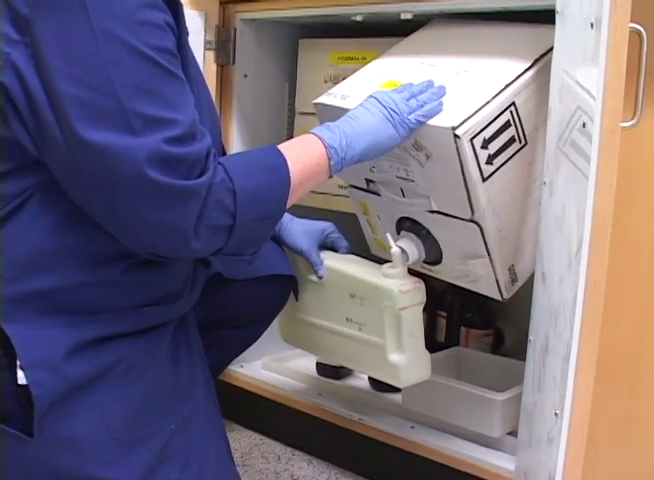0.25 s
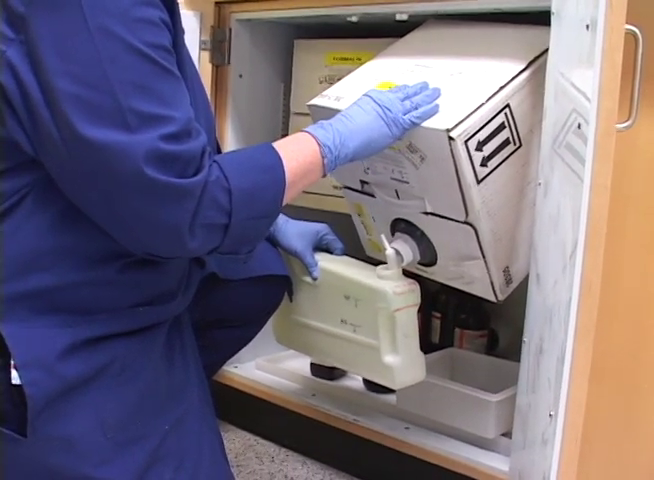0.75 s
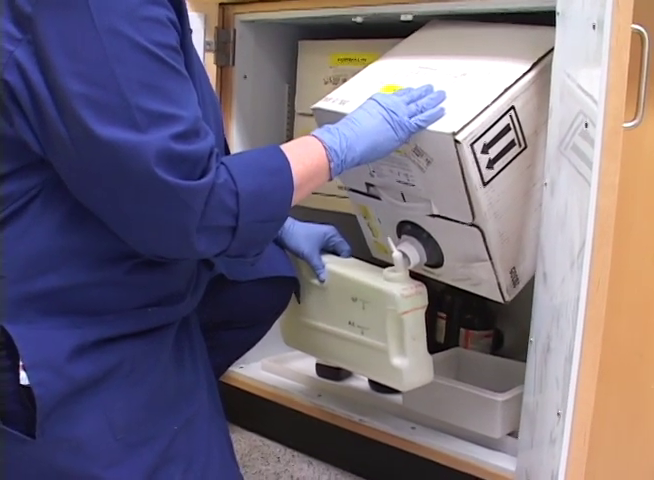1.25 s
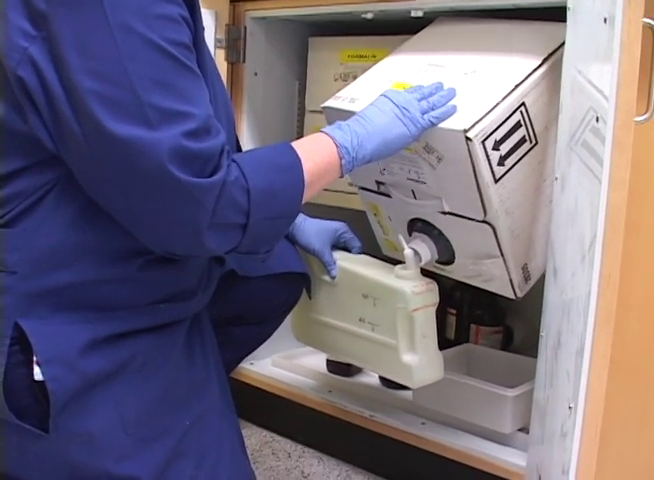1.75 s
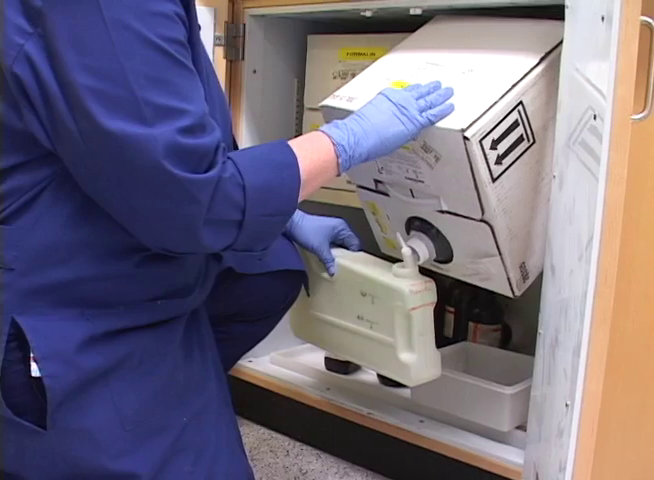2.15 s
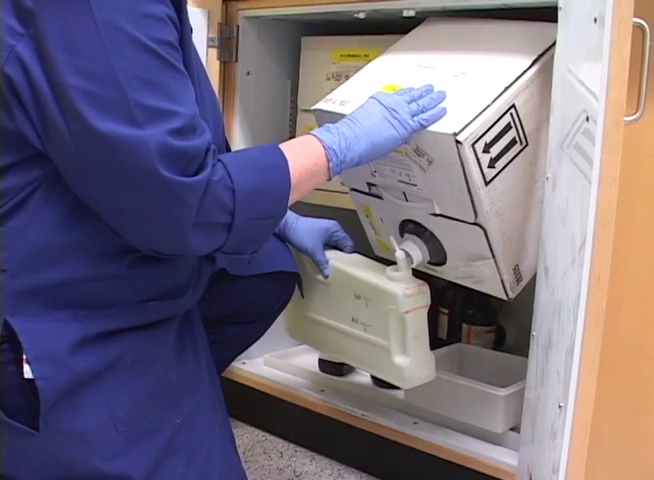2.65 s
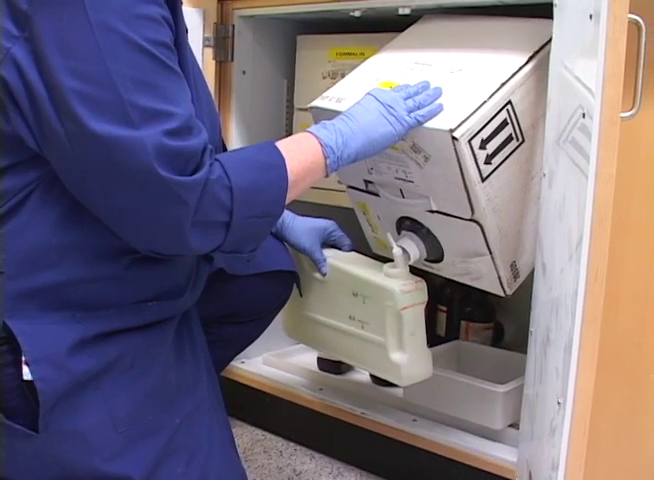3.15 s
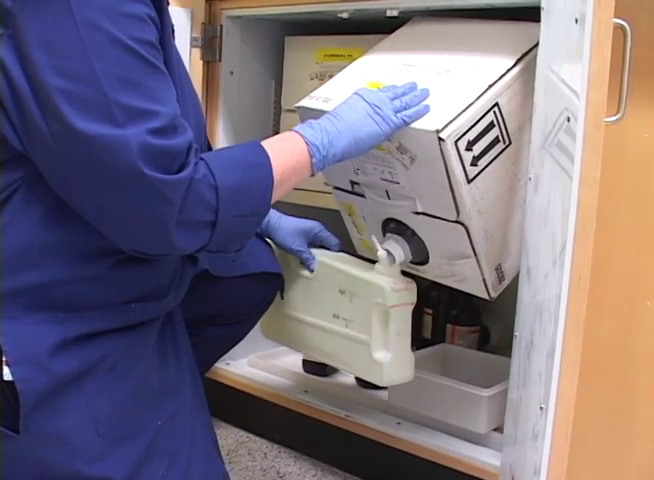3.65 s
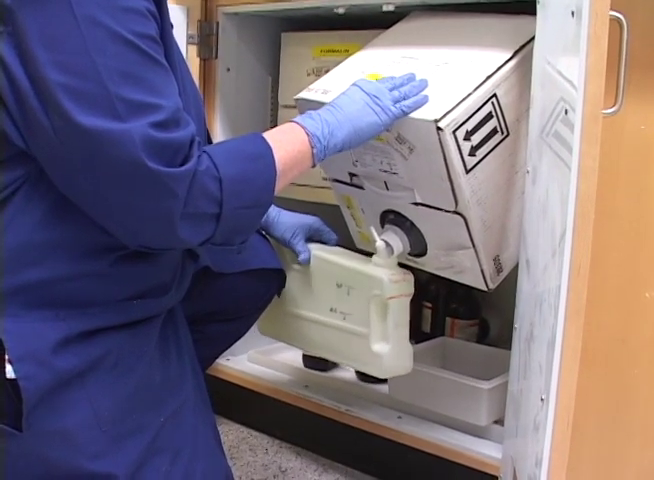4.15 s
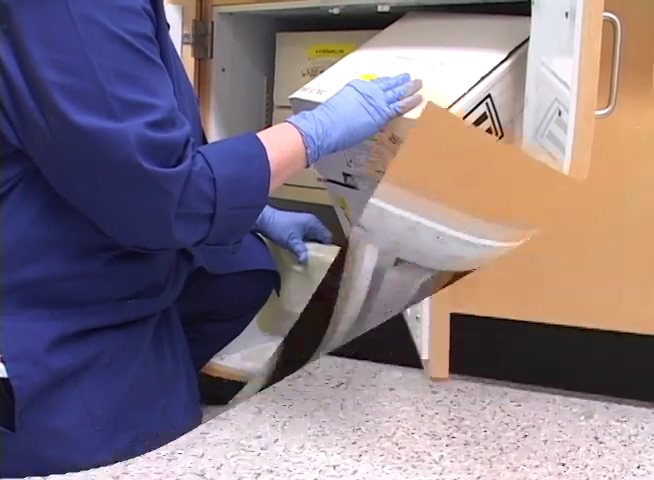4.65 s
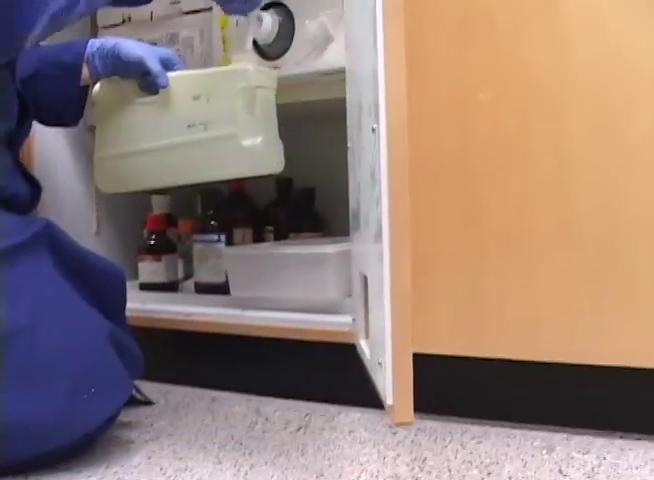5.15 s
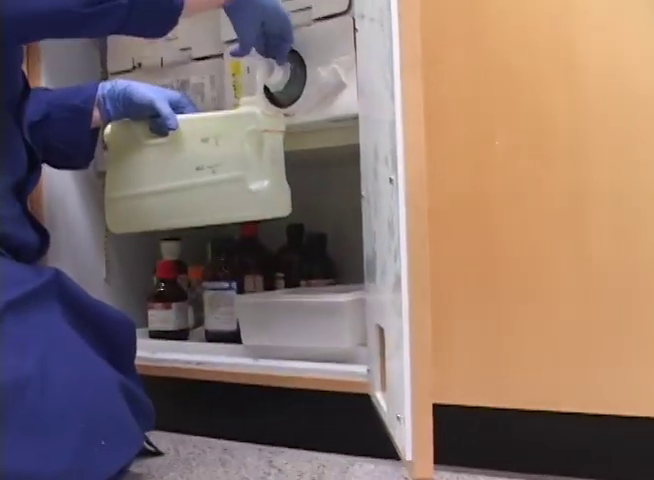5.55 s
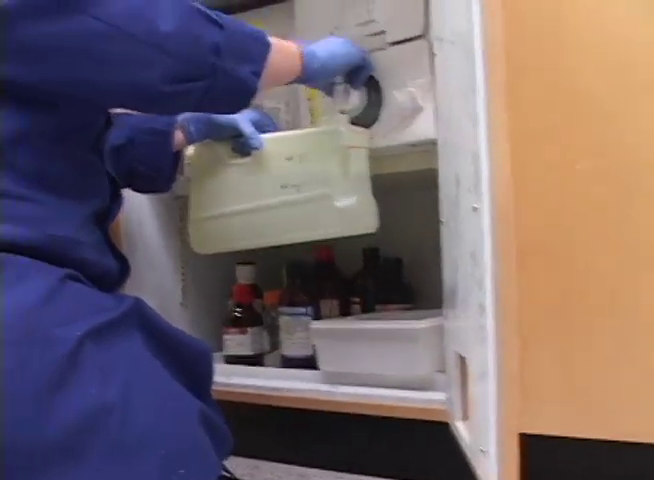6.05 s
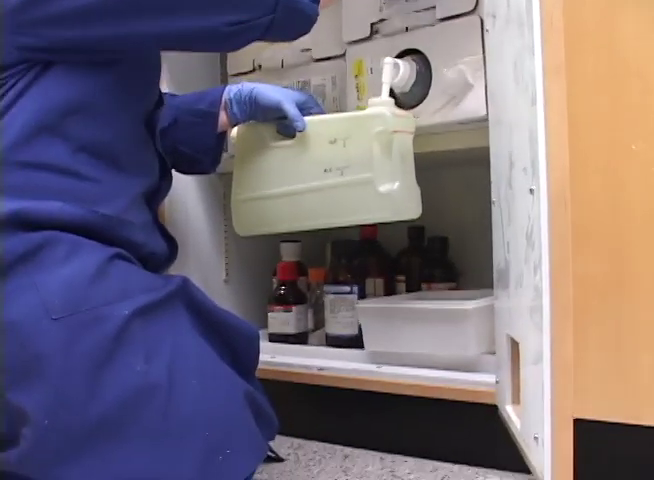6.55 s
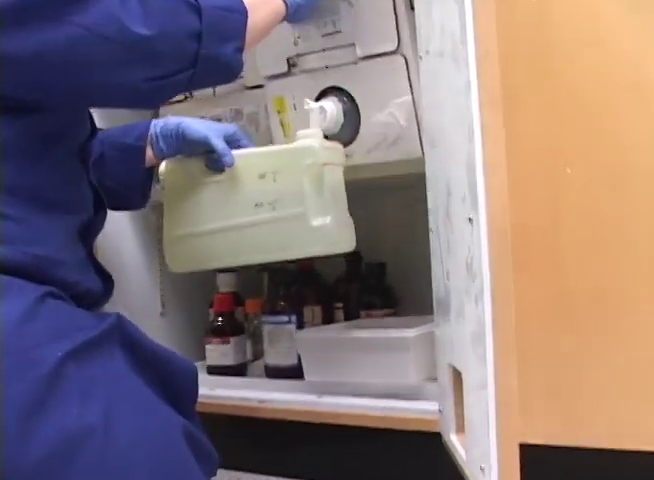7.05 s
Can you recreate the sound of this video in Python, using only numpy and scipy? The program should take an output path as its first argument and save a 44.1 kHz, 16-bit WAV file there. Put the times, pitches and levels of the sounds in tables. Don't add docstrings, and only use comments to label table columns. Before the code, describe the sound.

A thin stream trickles and plinks into a plastic bottle, a hollow knock follows, then gloved hands rub and creak and a tap lever snaps shut.

```python
import sys
import numpy as np
from scipy import signal
from scipy.io import wavfile
from scipy.ndimage import uniform_filter1d

SR = 44100
rng = np.random.default_rng(int(sys.argv[2]) if len(sys.argv) > 2 else 0)


def magnitude_from_level(level_db):
    exponent = np.asarray(level_db, float) / 20
    return 10 ** exponent


def digitize_waveform(pressure):
    field = np.atleast_2d(pressure).T
    bounded = np.clip(field, -1, 1)
    quanta = np.round(bounded * 32767).astype(np.int16)
    wavfile.write(sys.argv[1], SR, quanta)


N = 321489
STOP_S = 4.805

# f/Hz, width/Hz, level/dB
HUM_BANDS = [(479, 77, -70), (872, 27, -75), (1308, 22, -74.5), (2410, 113.8, -82), (5350, 192, -86)]
# f/Hz, level/dB per Hz
HISS_COLOUR = [(880, -32), (1500, -7), (2570, -3), (3650, -9), (5450, -16.5), (5950, -14.5), (9510, -16),
               (13700, -29), (15500, -57)]
# t/s, level/dB
STREAM_FLOW = [(0.0, -10.5), (0.15, -6), (0.5, 2.5), (0.71, 1), (1.18, 1), (1.32, 6.5), (1.55, 1.5),
               (1.99, -1.5), (2.46, -3.5), (2.62, 1), (2.9, 4), (3.53, -0.5), (3.74, 6.5), (4.0, 0),
               (4.67, 1.5), (4.8, 1.5)]
# t/s, level/dB
BOTTLE_SWAY = [
    (4.81, 0.5),
    (5.4, -3.5),
    (6.2, 1.5),
    (6.66, -2.5),
    (6.92, 1.5),
    (7.14, 7.5),
    (7.29, 10.5),
]
# f/Hz, width/Hz, level/dB
BOTTLE_AIR = [(119, 130, -10), (175, 22, 7), (238, 37.4, -3.5), (292, 15, -4.5)]
# f/Hz, level/dB per Hz
SLOSH_COLOUR = [(35, -43.5), (60, -24), (172, -0.5), (368, -8), (653, -9), (1270, -6), (2100, -23.5),
                (2390, -24.5), (3210, -28.5), (5000, -34.5), (6500, -72), (11000, -120)]
# f/Hz, width/Hz, level/dB
SLOSH_MODES = [(782, 80, -3), (1011, 30.4, 1.5), (1294, 24.75, -1), (1893, 230, 3.5), (2397, 53, 1.5)]
# f/Hz, width/Hz, level/dB
NECK_MODES = [(2400, 240, -0.5), (4080, 1806, -4.5), (5400, 310, -10), (6200, 1200, -4), (7710, 740, -8),
              (8500, 390, -4), (10300, 540, 0.5), (11800, 470, -2), (13400, 1400, -5)]
# t/s, peak level/dB
STREAM_SURGES = [(0.396, -42), (0.476, -42), (0.565, -65), (0.647, -39), (0.73, -43), (0.9, -32),
                 (1.069, -61), (1.177, -28.5), (1.251, -44), (1.313, -52), (1.358, -29.5), (1.404, -51),
                 (1.513, -58), (1.651, -43), (1.704, -42), (1.745, -37), (1.955, -62), (2.398, -55),
                 (2.575, -38), (2.638, -52), (2.705, -58), (2.835, -35), (2.969, -35), (3.011, -49),
                 (3.076, -42), (3.153, -45), (3.214, -33.5), (3.264, -37), (3.445, -31), (3.539, -38.5),
                 (3.597, -26.5), (3.678, -29), (3.766, -44), (3.931, -58), (4.023, -33.5), (4.117, -35),
                 (4.182, -45), (4.263, -50), (4.316, -45), (4.456, -59), (4.508, -35), (4.573, -43),
                 (4.66, -52), (4.726, -32), (4.775, -38)]
# t/s, peak level/dB, f/Hz, length/s
LOW_SWELLS = [(0.628, -38, 184, 0.013), (0.879, -49, 190, 0.072), (1.138, -43, 181, 0.032),
              (1.368, -42, 232, 0.027), (1.431, -36.5, 165, 0.022), (1.691, -38.5, 172, 0.031),
              (2.949, -40, 175, 0.055), (3.219, -48, 147, 0.073), (4.066, -42, 174, 0.028),
              (4.189, -41.5, 168, 0.039), (4.455, -36, 179, 0.046), (4.569, -35, 171.3, 0.059),
              (4.71, -39.5, 284, 0.056), (4.898, -46, 149, 0.033), (5.245, -45, 113, 0.032),
              (4.794, -38, 225, 0.0096), (5.951, -35, 314, 0.014), (5.982, -40, 195, 0.012),
              (3.68, -18, 184, 0.0067), (7.146, -26, 300.5, 0.035), (5.53, -50.5, 172, .06),
              (5.69, -51, 151, .035), (6.2, -46, 188, .06), (6.62, -51, 169.3, .09), (7.075, -42, 268, .04),
              (7.128, -33, 189, .02), (7.16, -30, 215, .05), (7.255, -48, 177, .035)]
# t/s, peak
# level/dB, f/Hz, splash level/dB against the peak
SMALL_BUBBLES = [(0.232, -30, 9820, -23), (0.401, -29, 10170, -7), (0.449, -31.5, 8400, -27),
                 (0.6297, -25, 11170, -11), (0.8665, -40, 10200, 2), (0.8915, -13, 10250, -15),
                 (0.9735, -18, 10250, -12.5), (1.08, -34, 7740, -4.5), (1.1282, -21, 10270, -20),
                 (1.3544, -40.5, 10360, 6), (1.3772, -30.5, 10900, -2), (1.475, -35, 10740, -4),
                 (1.5306, -35, 9900, -2.5), (1.6023, -31.5, 10300, -20), (1.6631, -30.5, 10060, -8),
                 (1.984, -30, 10100, 0), (2.7256, -30, 11800, -11), (2.958, -26.5, 11460, -2.5),
                 (3.2936, -30.5, 11540, -25), (3.4314, -35, 11540, -7), (3.5178, -34, 9900, -10),
                 (3.5818, -23, 10230, -11), (3.7155, -34.5, 11570, -2.5), (4.3866, -51, 9150, 11.5),
                 (4.5065, -23.5, 10300, -5), (4.6458, -28.5, 11800, -13), (4.6867, -29.5, 10320, -14),
                 (5.253, -53, 9600, 9.5), (6.3675, -58, 10800, 10.5), (6.6441, -38.5, 9100, -12)]
# t/s, peak level/dB, f/Hz
FAINT_BUBBLES = [(0.2867, -50, 11800), (0.3205, -49, 10000), (0.3467, -42, 8500), (0.379, -43, 9500),
                 (1.063, -45, 12100), (1.424, -41.5, 8100), (1.7454, -49, 11900), (1.918, -43, 12900),
                 (1.9656, -44.5, 7900), (2.217, -48, 11600), (2.262, -53.5, 7550), (2.379, -55, 11750),
                 (2.4274, -53, 11800), (2.499, -53, 11450), (3.258, -48, 11800), (3.3508, -48, 9300),
                 (3.6351, -47, 11800), (3.881, -40.5, 8830), (4.21, -54, 9400), (4.2582, -48.5, 11650),
                 (.73, -52.5, 4300)]
# t/s, peak level/dB
FAINT_DRIPS = [(0.101, -54), (0.204, -51), (0.5438, -39.5), (0.576, -42), (0.65, -36.5), (0.7174, -49),
               (1.0277, -45.5), (1.1126, -42), (1.22, -46.5), (1.272, -46), (1.495, -37.5), (1.585, -41),
               (1.804, -44), (1.876, -53), (1.952, -50), (2.0936, -54), (2.17, -45), (2.326, -51.5),
               (2.528, -44), (2.7931, -45), (4.5953, -46)]
# t/s, peak level/dB, f/Hz
SPECK_BUBBLES = [(0.0353, -56, 10250), (0.1311, -55, 10400), (0.163, -56, 8250), (0.2693, -48, 8540),
                 (0.5315, -47, 10300), (0.6967, -58, 10300), (0.8169, -50, 10400), (1.3218, -41, 11800),
                 (1.453, -53, 10600), (1.5683, -39, 10300), (1.73, -44, 11500), (1.7809, -41, 9950),
                 (2.0228, -42, 10800), (2.1339, -52, 11800), (2.1999, -44, 10300), (2.7053, -56, 11800),
                 (2.8359, -51, 10300), (2.8506, -40, 10300), (2.9312, -62, 11800), (3.0389, -44.5, 9800),
                 (3.0729, -49, 11600), (3.121, -44, 11700), (3.1582, -57, 10000), (3.1817, -49, 9220),
                 (3.209, -45, 11400), (3.3174, -42, 9750), (3.5546, -45, 10300), (3.8332, -48.5, 8800),
                 (4.1614, -50, 8500), (4.4742, -66, 10400), (4.7611, -49, 9700), (4.789, -50, 10200)]
# t/s, peak level/dB, f/Hz, splash level/dB against the peak
LARGE_BUBBLES = [(0.7353, -42.5, 2250, -18), (0.8926, -30.5, 2473, -16), (0.9752, -53, 2360, -4),
                 (1.1773, -30.5, 2276, -33), (1.3557, -47, 2050, -10), (1.4265, -48, 2730, -6),
                 (1.6746, -36.5, 2413, -6.5), (1.7796, -42, 2270, -3), (2.203, -46.5, 2400, 0),
                 (2.5008, -51.5, 2630, 4.5), (2.8464, -38.5, 2674, -18), (2.982, -46.5, 2320, -22),
                 (3.0325, -38.5, 2380, -24), (3.2147, -46.5, 2380, -17), (3.5914, -45.5, 2750, -7),
                 (3.6347, -40, 1700, -0.5), (3.675, -41, 2300, -10), (4.5123, -46.5, 2180, -9),
                 (4.5735, -55.5, 2400, 3), (4.6908, -44.5, 2530, -3), (4.7254, -39, 2360, -19),
                 (4.7964, -49, 2350, -15)]
# t/s, peak level/dB, f/Hz
MIDDLE_BUBBLES = [(0.229, -51, 4700), (0.374, -30, 5980), (0.3814, -32.5, 6200), (1.0293, -35.5, 3834),
                  (1.251, -43.5, 5800), (1.471, -48, 6300), (1.539, -35, 3740), (1.585, -42, 7000),
                  (1.785, -40.5, 4980), (1.919, -48.5, 3490), (2.5664, -49.5, 4630), (2.6297, -44.5, 5950),
                  (2.639, -45.5, 4520), (2.959, -40.5, 8170), (3.261, -44.5, 5230), (3.316, -50, 6200),
                  (3.5163, -49, 4600), (3.737, -51, 5400), (3.836, -50.5, 4200), (3.977, -39.5, 3770),
                  (4.4777, -50, 3620), (4.51, -38, 8500), (4.53, -46.5, 5270), (4.575, -53, 3900),
                  (4.683, -48, 3880), (4.69, -39.5, 6010), (4.727, -49, 3560)]
# t/s, peak level/dB, f/Hz
SOFT_BLIPS = [(0.2838, -58, 4210), (0.3301, -57, 5220), (0.4834, -53, 4240), (0.545, -52, 5500),
              (0.63, -55, 5070), (0.695, -53, 6400), (0.8179, -59, 6260), (0.9757, -53, 5940),
              (1.0824, -54, 6500), (1.277, -50, 3940), (1.381, -57, 4670), (1.4264, -46, 6050),
              (1.6427, -52, 5870), (1.898, -62, 3600), (1.9859, -48.5, 5340), (2.0892, -57, 4580),
              (2.1063, -48.5, 4150), (2.179, -49.5, 6700), (2.2608, -58, 3930), (2.3244, -52.5, 3240),
              (2.4848, -54, 6460), (2.501, -51, 6400), (2.7057, -55, 5320), (2.7462, -56, 5170),
              (2.796, -57, 3970), (2.8745, -50.5, 5230), (2.908, -56, 5020), (2.964, -57, 5100),
              (3.0799, -52, 3500), (3.1063, -47, 4000), (3.1837, -56, 3530), (3.2869, -53, 5200),
              (3.3533, -51, 3840), (3.4327, -47, 4240), (3.5528, -55, 4840), (3.708, -43, 3780),
              (3.8851, -54, 3400), (4.2837, -53, 3200), (4.349, -57, 3820), (4.5077, -56, 3680),
              (4.5979, -48, 6370)]
# t/s, peak level/dB, f/Hz
MORE_BUBBLES = [(0.2305, -37.5, 8170), (0.4012, -38, 11500), (0.449, -34, 10500), (1.2715, -49, 12000),
                (1.3655, -35, 11700), (1.4545, -47, 7900), (1.677, -44, 12000), (0.371, -49, 2190)]
# t/s, peak level/dB, brightness level/dB
BOTTLE_KNOCKS = [(3.597, -56, 3), (3.612, -34.5, 4), (3.633, -24, -10), (3.655, -31, -4),
                 (3.712, -32.5, -1.5), (3.6803, -10, -19.5), (3.725, -18.5, -25), (4.51, -49, -1),
                 (4.69, -58, 12.5), (4.727, -56, 12.5), (4.797, -63, 2), (5.25, -60, 14), (5.51, -53.5, 11),
                 (5.951, -40, 9), (6.385, -47, 8), (7.068, -47, 9.5), (7.160, -23.5, 3.5)]
# f/Hz, level/dB, t60/s
WALL_MODES = [(123, 5.5, 0.15), (166.4, 0, 0.14), (208, 13.5, 0.084), (269, -1, 0.29), (291.3, -11.5, 0.25)]
# f/Hz, level/dB, t60/s
RIM_MODES = [(440, 1.5, 0.048), (709, -4, 0.052), (855, 11, 0.024), (1008, -1.5, 0.05), (1227, -15.5, 0.15),
             (1662, -3.5, 0.019), (2400, -25, 0.019)]
# t/s, peak level/dB, f/Hz, length/s
HAND_THUDS = [
    (4.9, -53, 70, 0.035),
    (5.24, -47.5, 60, 0.041),
    (5.52, -50.5, 55, 0.04),
    (7.15, -30, 101, 0.032),
]
# start t/s, end t/s, level/dB
RUB_STROKES = [
    (4.937, 5.052, -55.5),
    (5.157, 5.193, -54.5),
    (5.241, 5.273, -46),
    (5.352, 5.387, -53),
    (5.483, 5.588, -54),
    (5.676, 5.753, -58.5),
    (6.13, 6.174, -55),
    (6.352, 6.47, -52.5),
    (6.586, 6.663, -54),
    (7.1, 7.15, -66),
]
# f/Hz, level/dB per Hz
RUB_COLOUR = [(120, -18), (200, 1.5), (677, -13.5), (918, 3), (1120, -49), (1310, -14), (1950, -16),
              (4360, -30), (12600, -36.5), (14500, -49)]
# start t/s, length/s, level/dB, f/Hz, width/Hz
TAP_SQUEAKS = [(5.233, 0.045, -57, 12900, 1200), (5.957, 0.39, -83, 9700, 49.4),
               (6.637, 0.025, -47, 9700, 500), (6.803, 0.093, -73, 6900, 500),
               (7.077, 0.092, -65.5, 13400, 694), (7.083, 0.12, -51, 10000, 900),
               (7.092, 0.071, -63, 7000, 4500), (7.162, 0.06, -60, 3250, 250),
               (7.187, 0.13, -56.5, 7000, 500), (7.217, 0.089, -59.5, 3250, 170),
               (7.222, 0.085, -62, 8400, 430)]
# start t/s, length/s, level/dB
GLOVE_CREAKS = [
    (4.916, 0.15, -47.5),
    (5.487, 0.31, -59),
    (5.943, 0.15, -50),
    (6.289, 0.23, -58.5),
    (6.528, 0.22, -61),
    (6.793, 0.18, -69.5),
]
# start t/s, length/s, level/dB, first f/Hz, last f/Hz
SLIDING_SCRAPES = [
    (6.362, .052, -45, 420, 1050),
    (6.362, .065, -65, 7500, 7200),
    (6.42, .045, -65, 8000, 8800),
    (3.628, .025, -42, 1500, 1800),
]
# t/s, peak level/dB
DRY_TICKS = [
    (4.5075, -60),
    (4.724, -52),
    (4.795, -61),
    (4.8635, -39.5),
    (5.922, -57.5),
    (5.951, -56),
]
# f/Hz, width/Hz, level/dB
TICK_COLOUR = [(1800, 1200, 3.5), (3690, 1500, -12.5), (6400, 950, 13), (10300, 1200, -19)]
# t/s, level/dB
LEVER_SNAPS = [
    (7.1425, -22),
    (7.1447, -6),
    (7.155, -11),
    (7.164, -22),
]
# f/Hz, level/dB, t60/s
LEVER_MODES = [(1915, -6.5, 0.013), (2905, 1, 0.02), (3157, 3, 0.015), (4300, -14, 0.0051),
               (5346, -1, 0.021), (5940, -5, 0.023), (7140, -28, 0.0057), (7970, -6, 0.013),
               (9190, 7, 0.0076), (10230, -3.5, 0.0099), (11500, -8, 0.0044), (12900, -28, .005)]
# f/Hz, level/dB, t60/s
LEVER_BODY_MODES = [(563, -5, 0.023), (747, 2, 0.02), (898, -5, 0.022), (967, 0.5, 0.018)]


def evened(x):
    return x / np.sqrt(np.mean(x ** 2) + 1e-20)


def add(mix, s, sound):
    part = mix[round(s * SR):][:len(sound)]
    part += sound[:len(part)]


def resonate(x, modes):
    out = np.zeros(len(x))
    for hz, width, db in modes:
        r = np.exp(-np.pi * np.clip(width, 5, 5000) / SR)
        out += magnitude_from_level(db) * 2 * signal.lfilter([1 - r], [1, -r * np.exp(2j * np.pi * hz / SR)], x).real
    return out


def narrow_band(x, hz, width):
    mode = [(hz, width, 0)]
    return evened(resonate(resonate(x, mode), mode))


def noise(colour, patchy_db):
    frames, hz = N // 128 + 5, np.fft.rfftfreq(512, 1 / SR)
    a, b, patches = rng.standard_normal((frames, 257, 3)).T
    patches = uniform_filter1d(patches, size=4, axis=0)
    patches = evened(uniform_filter1d(patches, size=10, axis=1))
    f, db = np.transpose(colour)
    colour_db = np.interp(np.log(hz + 1), np.log(f + 1), db)
    gain = magnitude_from_level(colour_db[:, None] + patchy_db * patches)
    return evened(signal.istft((a + 1j * b) * gain, nperseg=512, noverlap=384)[1][:N])


def grains(per_s, spread_db):
    size = magnitude_from_level(spread_db * np.minimum(rng.exponential(1, N), 4)) * rng.choice([-1., 1.], N)
    return size * (rng.random(N) < per_s / SR)


def ring(modes, rise_s):
    t = np.arange(SR // 3) / SR
    tone = sum(magnitude_from_level(db - 60 * t / t60) * np.sin(2 * np.pi * hz * t) for hz, db, t60 in modes)
    tone *= 1 - np.exp(-(t / rise_s) ** 2)
    return tone / abs(tone).max()


def swells(table):
    out = np.zeros(N)
    for s, db, hz, length in table:
        t = np.arange(0, max(length, .01), 1 / SR)
        add(out, s, magnitude_from_level(db) * np.sin(np.pi * t / t[-1]) * np.sin(2 * np.pi * hz * t))
    return out


def cabinet(tracks, t60, wet_db):
    out = tracks.sum(0)
    for track in tracks:
        taps, at = np.zeros(8000), np.arange(60, 7970, 24)
        taps[at + rng.integers(0, 24, len(at))] = rng.choice([-1., 1.], len(at))
        taps *= magnitude_from_level(-60 * np.arange(len(taps)) / SR / t60)
        out = out + magnitude_from_level(wet_db) * signal.oaconvolve(track, taps / np.linalg.norm(taps))[:N]
    return out


def hum():
    air = rng.standard_normal(N)
    return sum(magnitude_from_level(db) * narrow_band(air, hz, width) for hz, width, db in HUM_BANDS)


def room():
    return magnitude_from_level(-72.5) * noise(HISS_COLOUR, patchy_db=2.0) + hum()


def ticks():
    tracks, t = np.zeros((2, N)), np.arange(2000) / SR
    shape = np.minimum(t / 0.00096, 1) * magnitude_from_level(-60 * t / 0.013)
    for k, (s, db) in enumerate(DRY_TICKS):
        crack = resonate(rng.standard_normal(len(t)) * shape, TICK_COLOUR)
        add(tracks[k % 2], s, magnitude_from_level(db) * crack / abs(crack).max())
    return cabinet(tracks, t60=0.055, wet_db=-9.0)


def rubs():
    slide = noise(RUB_COLOUR, patchy_db=5.4)
    grain = uniform_filter1d(abs(grains(650, 3.1)), size=60)
    rub = evened(slide * (0.55 + 5.5 * grain))
    strokes = np.zeros(N)
    for start, end, db in RUB_STROKES:
        add(strokes, start, magnitude_from_level(db) * signal.windows.tukey(round((end - start) * SR), .6))
    return strokes * rub


def squeaks():
    out = np.zeros(N)
    creaks = [row + (1282, 95) for row in GLOVE_CREAKS]  # f/Hz, width/Hz of the handle
    for start, length, db, hz, width in TAP_SQUEAKS + creaks:
        rub = narrow_band(rng.standard_normal(SR // 2)[:round(length * SR)], hz, width)
        add(out, start, magnitude_from_level(db) * rub * np.hanning(len(rub)))
    return out


def scrapes():
    out = np.zeros(N)
    for start, length, db, first_hz, last_hz in SLIDING_SCRAPES:
        a, b = rng.standard_normal((2, SR // 4))[:, :round(length * SR)]
        r = np.exp(-np.pi * .14 * last_hz / SR)
        band = signal.lfilter([1], [1, -2 * r, r * r], a + 1j * b)
        carrier = np.exp(2j * np.pi * np.cumsum(np.linspace(first_hz, last_hz, len(a))) / SR)
        add(out, start, magnitude_from_level(db) * evened((band * carrier).real) * np.hanning(len(a)))
    return out


def knocks():
    booms, tracks = np.zeros(N), np.zeros((2, N))
    wall, rim = ring(WALL_MODES, rise_s=0.0026), ring(RIM_MODES, rise_s=.0012)
    for k, (s, db, bright_db) in enumerate(BOTTLE_KNOCKS):
        add(booms, s, magnitude_from_level(db) * wall)
        add(tracks[k % 2], s, magnitude_from_level(db + bright_db) * rim)
    return booms + cabinet(tracks, t60=0.12, wet_db=0.7) + swells(HAND_THUDS)


def lever():
    tracks = np.zeros((2, N))
    click = .74 * ring(LEVER_MODES, rise_s=.002) + magnitude_from_level(-3) * ring(LEVER_BODY_MODES, rise_s=0.0022)
    t = np.arange(len(click)) / SR
    decay = magnitude_from_level(-60 * t / 0.014) + magnitude_from_level(-16.5 - 60 * t / 0.174)
    crack = rng.standard_normal(len(t)) * np.minimum(t / 0.0039, 1) * decay
    crack = resonate(crack, [(7000, 6600, -5.0), (1170, 890, 11), (3000, 280, -3), (5500, 360, 5)])
    for k, (s, db) in enumerate(LEVER_SNAPS):
        add(tracks[k % 2], s, magnitude_from_level(db) * (click + magnitude_from_level(-18.0) * crack))
    return cabinet(tracks, t60=0.055, wet_db=-11.0)


def control(middle_db, db_per_flow_db, fill_db_per_s, stop_step_db):
    t, (s, flow_db) = np.arange(N) / SR, np.transpose(STREAM_FLOW + BOTTLE_SWAY)
    level_db = middle_db + db_per_flow_db * np.interp(t, s, flow_db)
    filled_db = fill_db_per_s * np.minimum(t, STOP_S)
    return magnitude_from_level(level_db + filled_db + stop_step_db * (t >= STOP_S))


def lumps():
    steps = uniform_filter1d(rng.standard_normal(N // 256 + 2), size=6)
    return np.interp(np.arange(N) / 256, np.arange(len(steps)), evened(steps))


def surges():
    t, out, rise_s = np.arange(SR // 4) / SR, np.zeros(N), 0.0061
    for s, db in STREAM_SURGES:
        add(out, s - rise_s / 2, magnitude_from_level(db - 14.5 - 60 * t / 0.24) * np.minimum(t / rise_s, 1))
    return out * (np.arange(N) < STOP_S * SR)


def bubble(hz, cycles, splash_db):
    t = np.arange(2000) / SR
    shape = magnitude_from_level(-60 * t * hz / cycles) * (1 - np.exp(-(t / 0.001) ** 2))
    ping = shape / shape.max() * np.sin(2 * np.pi * hz * t * (1 + 1.9 * t))
    burst = np.exp(-((t - .0008) / 0.000209) ** 2) * np.sin(2 * np.pi * hz * t)
    hiss, spray_s = rng.standard_normal(len(t)), 0.0023
    spray = hiss * t / spray_s * np.exp(-t / spray_s)
    neck = [(f * (1 + .025 * hiss[0]), width, db) for f, width, db in NECK_MODES]
    splash = resonate(resonate(signal.fftconvolve(burst, spray)[:len(t)], neck), neck)
    mist = resonate(spray, neck)
    return ping + magnitude_from_level(splash_db) * (splash / abs(splash).max() + magnitude_from_level(-14) * mist / abs(mist).max())


def swarm(pitches, per_s, spread_db, cycles, splash_db):
    tracks = np.zeros((2, N))
    for k, hz in enumerate(pitches):
        tracks[k % 2] += signal.oaconvolve(grains(per_s, spread_db), bubble(hz, cycles, splash_db))[:N]
    return tracks


def gurgle(flicker):
    running = np.where(np.arange(N) < STOP_S * SR, 1, .45)
    air = resonate(noise([(20, 0.00046), (20000, 0.01)], patchy_db=4.1), BOTTLE_AIR)
    air = evened(resonate(air, [(198, 300, 0)]))
    wide = noise(SLOSH_COLOUR, patchy_db=2.77)
    slaps = signal.oaconvolve(grains(410, 6.2), np.hanning(24) / 8, "same")
    rings = resonate(wide + 1.4 * running * slaps, SLOSH_MODES)
    plops = swarm(np.geomspace(500, 2700, num=10), per_s=5.62, spread_db=4.65, cycles=29.5, splash_db=-42.5)
    plops = cabinet(plops, t60=0.02, wet_db=-1.3)
    slosh = evened(wide + magnitude_from_level(-5.0) * running * evened(rings) + magnitude_from_level(-6) * running * evened(plops))
    air_gain = control(-56, db_per_flow_db=1.5, fill_db_per_s=0.47, stop_step_db=-2)
    slosh_gain = control(-57, db_per_flow_db=1.13, fill_db_per_s=1.1452, stop_step_db=-4.5)
    flow = magnitude_from_level(1.0 * running * flicker) * (air_gain * air + slosh_gain * slosh)
    return flow + surges() * (slosh + 0.42 * air) + swells(LOW_SWELLS)


def fizz(flicker):
    tiny = swarm(np.geomspace(2300, 12300, num=18), per_s=22.0, spread_db=2.86, cycles=55.1, splash_db=-5.5)
    tiny = cabinet(tiny, t60=0.041, wet_db=4.0)
    tiny = signal.lfilter([1, -.85], [1], tiny) * (np.arange(N) < STOP_S * SR)
    froth = noise([(20, 0.013), (20000, 0.022)], patchy_db=4.1)
    gain = control(-70.5, db_per_flow_db=2.13, fill_db_per_s=-1.0, stop_step_db=-0.5)
    return magnitude_from_level(2.4 * flicker) * gain * evened(resonate(evened(tiny) + 0.18 * froth, NECK_MODES))


def bubbles(table, cycles, t60, wet_db):
    tracks, chance = np.zeros((4, N)), rng.random((len(table), 2))
    for k, (s, db, hz, splash_db) in enumerate(table):
        add(tracks[k % 4], s, magnitude_from_level(db) * bubble(hz, cycles, splash_db))
        later, other_hz = s + .002 + 0.0076 * chance[k, 0], hz * (0.83 + .2 * chance[k, 1])
        add(tracks[k % 4], later, magnitude_from_level(db - 17.0) * bubble(other_hz, cycles, splash_db))
    return cabinet(tracks, t60, wet_db)


def more_bubbles():
    return bubbles([row + (-11,) for row in MORE_BUBBLES], cycles=90, t60=.07, wet_db=-5)


def drops():
    small = SMALL_BUBBLES + [row + (-1,) for row in FAINT_BUBBLES]
    small += [(s, db, 10250, -0.5) for s, db in FAINT_DRIPS]
    small += [(s, db - 7, hz, -1.5) for s, db, hz in SPECK_BUBBLES]
    large = LARGE_BUBBLES + [row + (-11,) for row in MIDDLE_BUBBLES]
    blips = [(s, db - 4.5, hz, -2) for s, db, hz in SOFT_BLIPS]
    return (bubbles(small, cycles=95.0, t60=0.081, wet_db=-6.5)
            + bubbles(large, cycles=58, t60=0.082, wet_db=2.3)
            + bubbles(blips, cycles=45, t60=0.06, wet_db=2.7))


def scene():
    pings = drops()
    background = room()
    flicker = lumps()
    stream = gurgle(flicker) + fizz(flicker) + pings
    handling = knocks() + lever() + rubs() + squeaks() + ticks() + scrapes()
    return (background + handling + stream + more_bubbles())[None]


def top_cut(x):
    return signal.sosfilt(signal.butter(12, 15850, fs=SR, output="sos"), x)


def record(dry):
    cut = signal.sosfilt(signal.butter(1, 80, "high", fs=SR, output="sos"), dry)
    cut = signal.sosfilt(signal.butter(10, 14200, fs=SR, output="sos"), cut)
    return top_cut(cut)


dry = scene()
out = record(dry)
digitize_waveform(out)
```